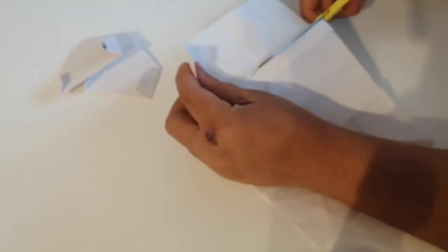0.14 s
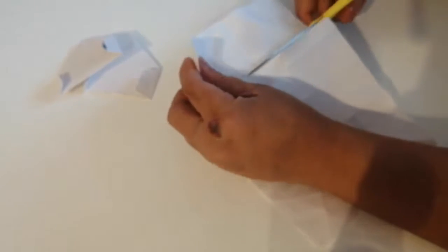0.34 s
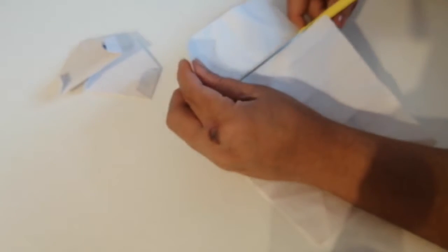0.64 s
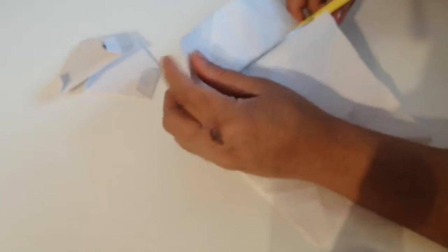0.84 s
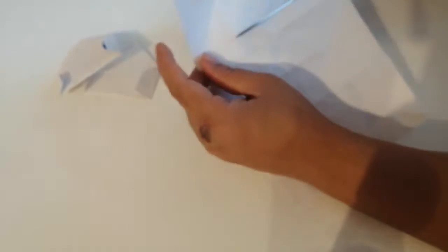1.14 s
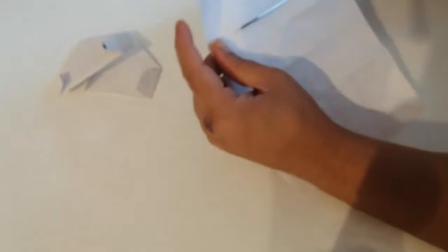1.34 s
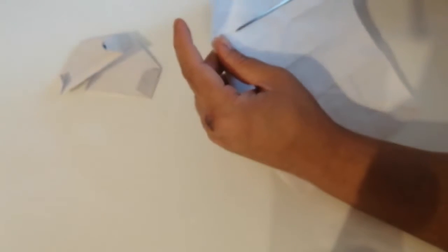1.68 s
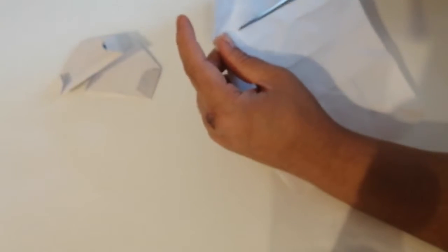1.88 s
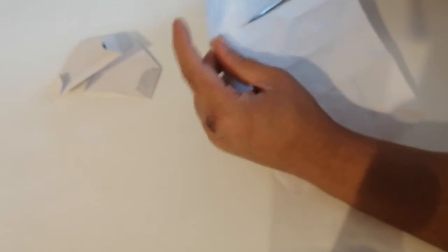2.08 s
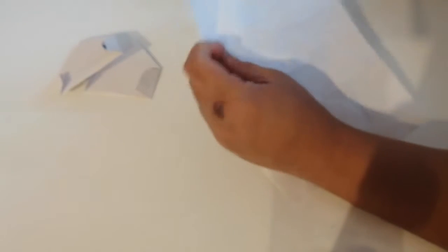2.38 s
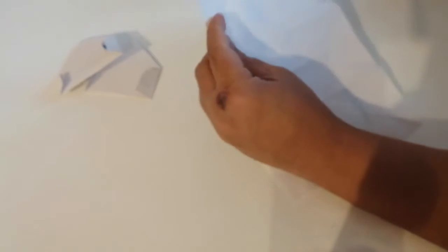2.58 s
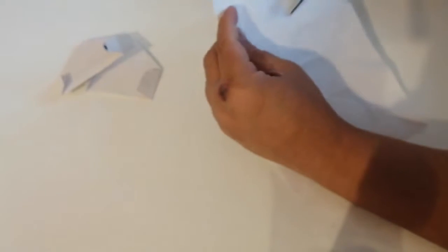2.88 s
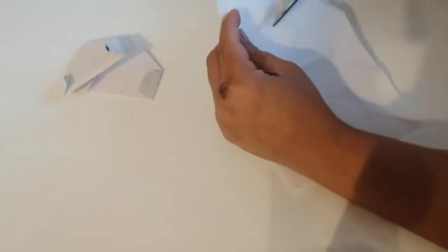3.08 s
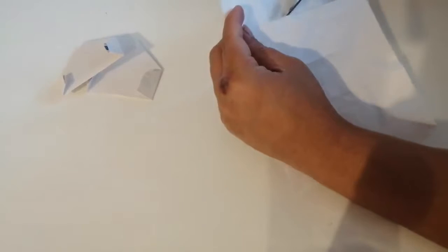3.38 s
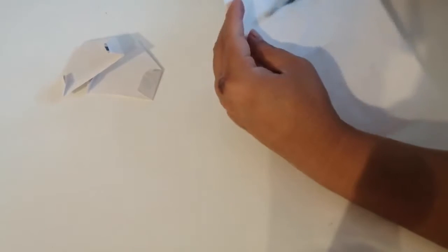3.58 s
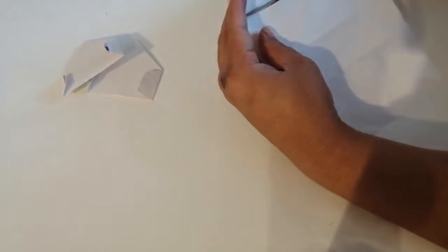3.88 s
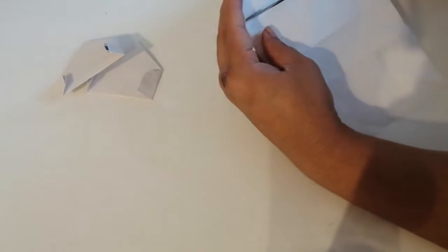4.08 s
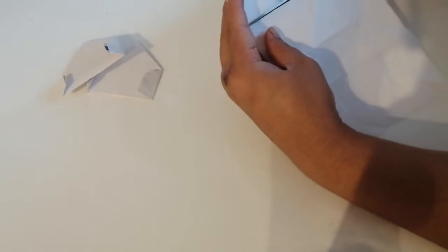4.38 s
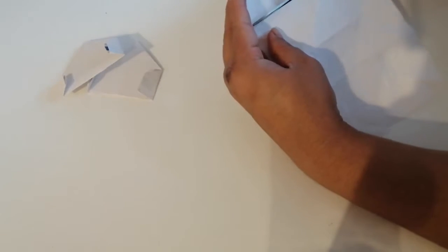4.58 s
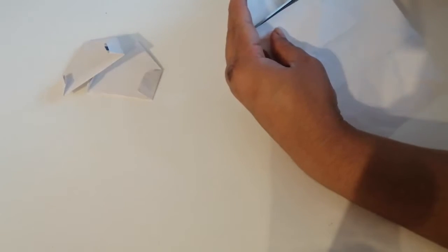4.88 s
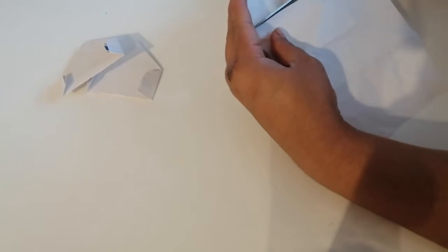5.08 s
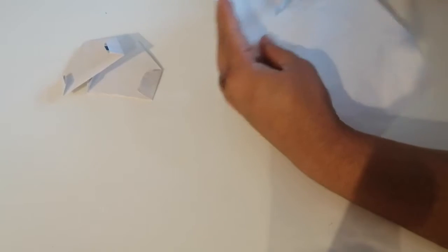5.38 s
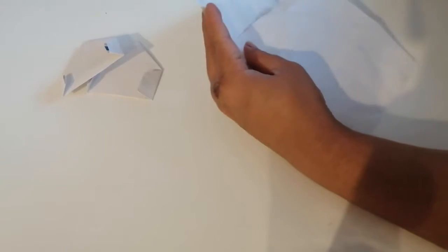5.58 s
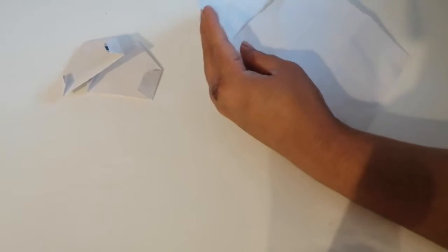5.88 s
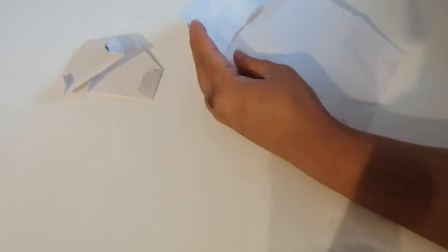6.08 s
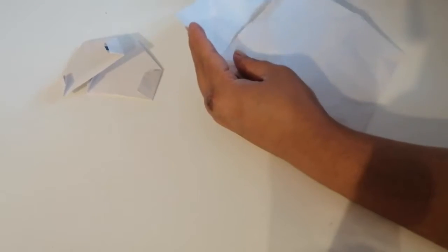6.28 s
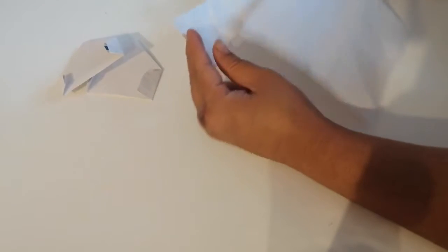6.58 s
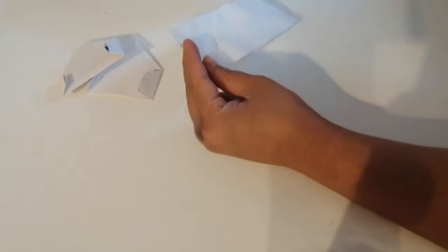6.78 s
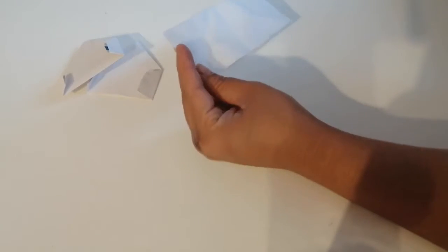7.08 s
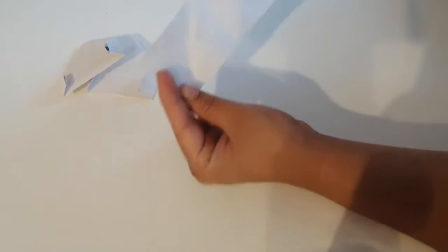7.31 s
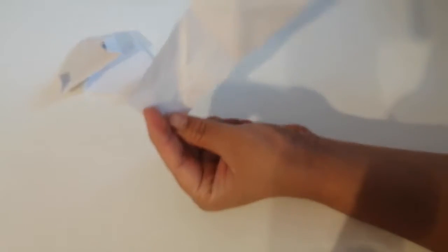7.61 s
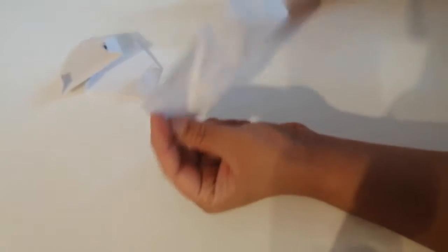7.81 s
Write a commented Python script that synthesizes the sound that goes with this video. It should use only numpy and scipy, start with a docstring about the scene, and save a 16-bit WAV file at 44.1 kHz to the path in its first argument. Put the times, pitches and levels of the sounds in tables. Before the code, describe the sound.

Scissors shear a sheet of paper above a table in a small quiet room, heard close in stereo. Crisp crunches and rustling come thickly at first, then in scattered groups with pauses. Near six seconds the sheet snaps and pops loudly with a brief steel ring, followed by soft hand knocks and a short papery slide sinking in pitch. A faint low hum and hiss lie beneath.

```python
"""Scissors cut a sheet of paper held just above a table in a small, quiet room, over hum and faint hiss.
From the start the blades shear fibres in short crunching noise bursts; between cuts the sheet rubs as grainy noise.
It also buckles with hollow pops and rings on as decaying tones. Near six seconds come the loudest pops, two jolts
of the whole sheet and the strongest ring of the blades. Then the hand shifts on the table with dull noise and
knocks, and at the end the cut piece slides away, a hiss with a hoarse whistle sinking in pitch."""
import sys
import numpy as np
from scipy import signal
from scipy.fft import rfft, irfft
from scipy.io import wavfile

SR = 44100
rng = np.random.default_rng(int(sys.argv[2]) if len(sys.argv) > 2 else 0)


def dump(signal):
    """Clip the signal to [-1, 1] and save it as 16-bit WAV at the path in sys.argv[1]."""
    limited = np.clip(np.atleast_2d(signal).T, -1, 1)
    pcm = np.round(limited * 32767).astype(np.int16)
    wavfile.write(sys.argv[1], SR, pcm)


N = 350448
TIME = np.arange(N) / SR
CRUNCH_RING_S = 0.0014  # decay time of a fibre break, shared by cuts and crinkles
BOTH_WAYS = np.array([[1], [-1]])  # left up, right down


def from_db(db):
    """Decibels to amplitude ratio: 20 dB is a factor of ten."""
    return 10 ** (np.asarray(db) / 20)


def rms_one(x):
    """Normalise to unit root-mean-square level over all channels."""
    return x / np.sqrt(np.mean(x ** 2) + 1e-20)


def at_hz(points, hz):
    """Interpolate a table of (Hz, value) on a logarithmic frequency axis."""
    f, value = np.transpose(points)
    return np.interp(np.log(np.maximum(hz, 1)), np.log(f), value)


def colour(x, spectrum, size=1024):
    """Minimum-phase filtering: folding the cepstrum makes the given spectrum causal."""
    magnitude = from_db(at_hz(spectrum, np.fft.rfftfreq(size, 1 / SR)))
    cepstrum = irfft(np.log(magnitude))
    cepstrum[1:size // 2] *= 2
    cepstrum[size // 2 + 1:] = 0
    response = irfft(np.exp(rfft(cepstrum)))
    return signal.oaconvolve(x, response[None], axes=1)[:, :x.shape[1]]


def band(x, low_hz, high_hz):
    """Band-pass filtering between two frequencies."""
    edges = [low_hz, min(high_hz, SR * 0.45)]
    return signal.sosfilt(signal.butter(2, edges, "band", fs=SR, output="sos"), x)


def drift(rate):
    """Slow random wander: straight lines between normal draws of spread 1, `rate` per second."""
    return np.interp(TIME * rate, np.arange(4096), rng.standard_normal(4096))


def resonate(x, hz, width_hz):
    """A two-pole resonance with unit gain near its peak."""
    r = np.exp(-np.pi * width_hz / SR)
    poles = [1, -2 * r * np.cos(2 * np.pi * hz / SR), r * r]
    return signal.lfilter([(1 - r * r) / 2, 0, (r * r - 1) / 2], poles, x)


def join_bass(x, below_hz=450):
    """Long waves reach both ports alike, so the stereo difference loses its bass."""
    high_pass = signal.butter(2, below_hz, "high", fs=SR, output="sos")
    side = signal.sosfilt(high_pass, (x[0] - x[1]) / 2)
    return x.mean(axis=0) + side * BOTH_WAYS


def add(out, sound, s):
    """Superpose a sound on the output, starting at s seconds."""
    i = max(round(s * SR), 0)
    out[:, i:i + sound.shape[1]] += sound[:, :N - i]


def fibres(n, grain_db, alike, lag=2):
    """Partly correlated noise of very uneven grains: tiny fibre breaks at two ports, the left one nearer."""
    grain_sizes = from_db(grain_db * np.minimum(rng.exponential(1, n // 16 + 1), 5))
    sizes = grain_sizes.repeat(16)[:n]
    shared = rng.standard_normal(n + lag)
    own = rng.standard_normal((2, n))
    alike = np.clip(alike, 0, 1)
    common = np.array([shared[lag:], shared[:n]])  # the right port hears it `lag` samples later
    return rms_one(sizes * (np.sqrt(alike) * common + np.sqrt(1 - alike) * own))


def arch(s, length):
    """Speed of one push from rest to rest: a single arch that peaks a little early."""
    skew, swell = 0.58, 1.23
    progress = np.clip((TIME - s) / length, 0, 1)
    return np.abs(np.sin(np.pi * progress ** skew)) ** swell


def gliding_band(hz, width_hz):
    """Quadrature modulation shifts low-passed noise to a moving centre frequency; stereo, rms 1."""
    phase = 2 * np.pi * np.cumsum(hz) / SR
    noise = [fibres(N, grain_db=2.0, alike=0.45) for _ in range(2)]
    swell = signal.sosfilt(signal.butter(2, width_hz, fs=SR, output="sos"), noise)
    return rms_one(swell[0] * np.sin(phase) + swell[1] * np.cos(phase))


def burst(length, levels_db, hz, spectrum, grain_db, ring_s, rise_s, snap, resonance_db, size=6144):
    """Impulsive excitation of a resonator: a first snap and a run of fibre breaks ring the bent sheet."""
    catch_db, catches_per_s = 1, 170  # the blades catch and slip within one cut
    ripple_db = 2.5  # each spot of the sheet favours its own pitches
    sheet_width_hz = 380
    length = np.clip(length, 0.001, 0.1)
    t = np.arange(size) / SR
    rise = 1 - np.exp(-t / (rise_s + length / 10))
    fall = np.exp(-np.maximum(t - length * 1.03, 0) / (ring_s + length / 10))
    catching = np.interp(t * catches_per_s, np.arange(64), rng.standard_normal(64))
    breaks = fibres(size, grain_db, alike=0.52) * rise * fall * from_db(catch_db * catching)
    breaks[:, 10] += snap
    pitches = np.geomspace(60, 15000, 72)
    rippled_db = at_hz(spectrum, pitches) + ripple_db * rng.standard_normal(len(pitches))
    sheet = join_bass(colour(breaks, np.column_stack([pitches, rippled_db])))
    sheet = sheet + from_db(resonance_db) * resonate(sheet, hz, sheet_width_hz)
    # low, middle and treble registers, each with its own level and alternating sign
    registers = [(80, 900), (900, 3800), (3800, 19000)]
    parts = [(-1) ** k * from_db(levels_db[k]) * rms_one(band(sheet, *edges))
             for k, edges in enumerate(registers)]
    return sum(parts) * np.sqrt(length * SR / size)  # energy in proportion to length


def background():
    """Steady sources: hum partials with slight phase and level modulation, and even coloured noise."""
    # Mains hum. Each row: frequency in Hz, rms level in dB before the slow swell.
    hum_partials = [(48.9, -89.5), (98.0, -63.5), (195.8, -90)]
    # Spectrum of the hiss. Each row: frequency in Hz, level in dB before normalising.
    hiss_colour = [(25, -15.5), (40, -11.5), (56, -18), (75, -14.5), (100, -20), (140, -15), (300, -22),
                   (1050, -28), (2000, -50), (2500, -29.5), (3050, -25.5), (3700, -42), (6000, -34.5),
                   (7800, -42.5), (15500, -39)]
    hiss_db = -65.5
    sway_s = 0.00015 * drift(6)
    swell = from_db(0.9 * drift(6))
    hum = sum(np.sqrt(2) * from_db(db) * np.sin(2 * np.pi * hz * (TIME + sway_s)) for hz, db in hum_partials)
    hiss = rms_one(colour(fibres(N, grain_db=2.0, alike=0.27), hiss_colour, size=4096))
    return hum * swell + from_db(hiss_db) * hiss


def room(x):
    """Reverberation: diffuse reflections decay at a rate set by frequency; a few standing waves stand out."""
    # Decay of the room. Each row: frequency in Hz, time to fall by 60 dB in seconds.
    decay_times = [(120, 0.4), (500, 0.64), (2000, 0.5), (6000, 0.38), (14000, 0.32)]
    # Standing waves. Each row: frequency in Hz, level in the impulse response in dB, 60 dB decay in seconds.
    standing_waves = [(114.3, -51.5, 0.5), (244, -78, 0.98), (290, -71, 0.65), (604, -41.5, 0.085)]
    gap_s, build_s = 0.004, 0.0009
    t, tail = TIME[:SR], 0
    edges = 70 * 2. ** np.arange(9)  # octaves
    for hz in edges[:-1] * np.sqrt(2):
        mid, side = band(rng.standard_normal((2, SR)), hz / np.sqrt(2), hz * np.sqrt(2))
        alike = 1 / (1 + (hz / 520) ** 4)  # the ports agree in the bass only
        stereo = np.sqrt(1 + alike) * mid + np.sqrt(1 - alike) * side * BOTH_WAYS
        tail = tail + stereo * from_db(-60 * t / at_hz(decay_times, hz))
    build_up = 1 - np.exp(-np.maximum(t - gap_s, 0) / build_s)
    tail = rms_one(tail * build_up) / np.sqrt(SR)  # unit energy
    tail = tail + sum(from_db(db - 60 * t / t60) * np.sin(2 * np.pi * hz * t) for hz, db, t60 in standing_waves)
    return signal.fftconvolve(x, tail, axes=1)[:, :N]


def shifting():
    """Sliding friction: the side of the hand drags over the table in uneven lumps of dull noise."""
    # Shifts of the hand. Each row: start in seconds, length in seconds, level at the arch's peak in dB.
    shifts = [(6.357, 0.3, -79), (6.74, 0.46, -72.5), (7.22, 0.77, -82)]
    # Spectrum of the rumble. Each row: frequency in Hz, level in dB before normalising.
    rumble_colour = [(100, -25), (190, -8), (290, -3), (400, -4), (550, 0), (750, -16), (1500, -21),
                     (4000, -43)]
    rumble = join_bass(colour(fibres(N, grain_db=2.5, alike=0.75), rumble_colour))
    rumble = rms_one(rumble * from_db(5 * drift(35)))
    return rumble * sum(from_db(db) * arch(s, length) for s, length, db in shifts)


def knocks():
    """Modal impact: soft contacts of hand and table ring low modes, each contact at a pitch of its own."""
    # Contacts. Each row: start in seconds, level in dB before the modes' own levels and the soft attack,
    # nominal lowest pitch in Hz before the random detuning.
    contacts = [(0.054, -53, 284), (0.092, -56, 292), (2.597, -69.5, 322), (4.118, -63, 297),
                (5.808, -58, 285), (6.321, -54.5, 270), (6.494, -71, 263), (6.715, -69, 300),
                (6.78, -70.5, 296), (6.901, -61.5, 340), (6.96, -73, 321), (7.002, -64, 275),
                (7.064, -61.5, 257), (7.288, -66, 296), (7.355, -66.5, 301), (7.576, -66, 301),
                (7.641, -60.5, 259), (7.703, -76, 253), (7.862, -71, 392)]
    # Table top. Each row: frequency in Hz (only ratios to the first count), relative level in dB,
    # 60 dB decay in seconds.
    table_modes = [(293.5, 11, 0.068), (359, 7.5, 0.056), (564, 6.5, 0.07)]
    sag, settle_s = 0.16, 0.015  # pitch starts flat by this share and climbs as the contact tightens
    out, t = np.zeros((2, N)), TIME[:SR // 4]
    elapsed = np.cumsum(1 - sag * np.exp(-t / settle_s)) / SR  # seconds, warped by the climb
    attack = 1 - np.exp(-t / 0.0045)
    for s, db, pitch_hz in contacts:
        ring = 0
        for hz, mode_db, t60 in table_modes:
            mode_hz = hz * pitch_hz / table_modes[0][0] * (1.076 + 0.033 * rng.normal())
            ring = ring + from_db(db + mode_db - 60 * t / t60) * np.sin(2 * np.pi * mode_hz * elapsed)
        add(out, (ring * attack)[None], s)
    return out


def slide():
    """Friction and air resonance: the piece glides; the gap beneath whistles hoarsely, sinking in pitch."""
    # Course of the slide. Each row: time in seconds, hiss level in dB, whistle level in dB (both before
    # the port trims), whistle pitch in Hz before its flutter.
    course = [(7.666, -65, -70, 2135), (7.687, -57.5, -68, 2050), (7.729, -61, -58.5, 2090),
              (7.81, -58.5, -58.5, 1843), (7.87, -56.5, -62, 1694), (7.914, -52.5, -59, 1690),
              (7.95, -60, -62, 1700)]
    # Spectrum of the hiss. Each row: frequency in Hz, level in dB before normalising.
    slide_colour = [(300, -5.5), (1000, -9), (2000, -10), (3200, -3), (3900, -14), (4700, -6.5),
                    (6700, -4.5), (8000, -10.5), (15000, -23)]
    port_db = np.array([[-5], [-1.5]])  # left, right
    s, hiss_db, whistle_db, hz = np.transpose(course)
    pitch_hz = np.interp(TIME, s, hz) * 2 ** (0.025 * drift(90))
    whistle = rms_one(gliding_band(pitch_hz, width_hz=105) * from_db(1.5 * drift(70)))
    hiss = rms_one(colour(fibres(N, grain_db=2.5, alike=0.24), slide_colour)) * from_db(1.8 * drift(50))
    return sum(x * from_db(np.interp(TIME, s, db, left=-120) + port_db)
               for x, db in [(hiss, hiss_db), (whistle, whistle_db)])


def crinkling():
    """Random impulses: sparse ticks of uneven size in the rubbing paper, each a brief decay of noise."""
    per_s, spread_db = 150, 4
    sizes = from_db(spread_db * np.clip(rng.standard_normal(N), -2, 2))
    ticks = (rng.random(N) < per_s / SR) * sizes
    decay = np.exp(-1 / (CRUNCH_RING_S * SR))
    envelope = signal.lfilter([1], [1, -decay], ticks + 1e-18)
    return rms_one(envelope * fibres(N, grain_db=1.0, alike=0.73))


def rubbing():
    """Stick-slip friction: paper over steel and skin, a grainy hiss with crinkles and fitful resonances."""
    # Pushes along blades, fingers or table. Each row: start in seconds, length in seconds, level in dB,
    # brightness (treble against the level) in dB, hollow resonance in Hz, crinkles in dB re unit rms.
    strokes = [(0.045, 0.2, -54.5, -13, 1300, 2.5), (0.24, 0.31, -54.5, -1, 1292, -7.5),
               (0.555, 0.25, -64.5, -9, 1686, -5.5), (0.696, 0.2, -59.5, -12, 915, -3),
               (0.828, 0.32, -73, 23.5, 1720, -10), (1.01, 0.2, -68.5, 13, 1595, -6),
               (1.243, 0.33, -55.5, -6, 612.6, -9.5), (1.575, 0.19, -60, 4, 1402, -1.5),
               (2.05, 0.39, -58.5, 2, 1028, -4), (2.474, 0.37, -73.5, -0.5, 1370, -3.5),
               (2.911, 0.43, -56, -6, 1352, -8), (3.329, 0.65, -63, 4.5, 1649, -6),
               (3.517, 0.21, -61, 5.5, 1900, -4), (3.685, 0.48, -60.5, -7.5, 995, -6.5),
               (4.365, 0.1, -57.5, -12, 1464, -3), (4.553, 0.25, -56.5, -3.5, 1882, -2.5),
               (6.329, 0.79, -81, 14, 1790, -6), (6.88, 0.17, -58, -21, 500, -9),
               (7.15, 0.36, -68.5, 5, 2006, -6)]
    # Spectrum of the rub. Each row: frequency in Hz, level in dB before normalising.
    rub_colour = [(150, -33), (350, -7), (600, -4), (1300, -1.5), (2600, -2), (3700, -9), (5200, 0),
                  (6600, 5), (7600, -0.5), (8800, 5), (10500, -2.5), (12500, -9), (15000, 1)]
    flex_share, flex_rate = 1.1, 20  # share of the flexing resonances, their changes per second
    resting_db, resting_brightness_db = -74, -9.5  # the held sheet is never quite still
    # main resonance of the bent sheet
    hollow_db, hollow_wander_octaves, hollow_width_hz = -7.5, 0.16, 170
    grains = colour(fibres(N, grain_db=-1.5, alike=0.33), rub_colour)
    grains = grains * from_db(0.91 * drift(70) + 1.93 * drift(21))  # catches and lets go
    flexing = sum(resonate(grains, hz, hz / 14) * np.maximum(drift(flex_rate), 0)
                  for hz in np.geomspace(580, 9000, 14))
    grains = join_bass(grains + flex_share * flexing)
    ticks = join_bass(colour(crinkling(), rub_colour))

    pushes = np.array([from_db(db) * arch(s, length) for s, length, db, *_ in strokes])
    brightness_db, hz, crinkle_db = np.transpose(strokes)[3:]
    push, leading = pushes.max(axis=0), pushes.argmax(axis=0)  # the strongest push rules
    middle = np.maximum(push, from_db(resting_db))
    bright_push = (pushes * from_db(brightness_db)[:, None]).max(axis=0)
    treble = np.maximum(bright_push, from_db(resting_db + resting_brightness_db))
    crinkle_gain = from_db(crinkle_db)[leading]
    body, edge = [0.87 * rms_one(band(grains, *edges)) + crinkle_gain * rms_one(band(ticks, *edges))
                  for edges in [(180, 4300), (3900, 12700)]]
    hollow_hz = hz[leading] * 2 ** (hollow_wander_octaves * drift(13))
    hollow = gliding_band(hollow_hz, hollow_width_hz)
    return body * middle - edge * treble + from_db(hollow_db) * hollow * push


def thumps():
    """Modal excitation: jolts of the whole sheet make it ring briefly in its modes."""
    # Jolts. Each row: start in seconds, level in dB before the modes' own levels,
    # tilt in dB per octave about 300 Hz.
    jolts = [(5.913, -39, -1), (6.031, -30, 0.5)]
    # Modes of the whole sheet. Each row: frequency in Hz, relative level in dB, 60 dB decay in seconds.
    sheet_modes = [(124, -10, 0.14), (235, -11, 0.12), (286, 0, 0.11), (327, -5.5, 0.069),
                   (572, -6.5, 0.13), (1110, -17, 0.075), (1278, -0.5, 0.084), (1420, -12, 0.12)]
    out, t = np.zeros((2, N)), TIME[:SR // 2]
    for s, db, tilt_db in jolts:
        ring = 0
        for hz, mode_db, t60 in sheet_modes:
            level_db = db + mode_db + tilt_db * np.log2(hz / 300)
            ring = ring + from_db(level_db - 60 * t / t60) * np.sin(2 * np.pi * hz * t)
        add(out, ring[None], s)
    return band(out, 105, 6000)


def twangs():
    """Free vibration: a taut stretch let go rings on; its pitch rises and wavers as it springs flat."""
    # Releases. Each row: start in seconds, level in dB before the attack, settled pitch in Hz
    # before the waver, 60 dB decay in seconds.
    releases = [(0.092, -58, 659, 0.56), (0.378, -43.5, 615, 0.22), (0.739, -52, 656, 0.42),
                (1.303, -50.5, 600, 0.13), (2.156, -45.5, 615, 0.19), (5.242, -52, 640, 0.27),
                (5.913, -41.5, 591, 0.31)]
    sag, settle_s = 0.11, 0.013  # starts flat by this share and settles
    out, t = np.zeros((2, N)), TIME[:SR // 2]
    attack = 1 - np.exp(-t / 0.00097)
    for s, db, hz, t60 in releases:
        bend = 1 - sag * np.exp(-t / settle_s) + 0.02 * drift(63)[:len(t)]
        phase = 2 * np.pi * np.cumsum(hz * bend) / SR
        add(out, (np.sin(phase) * attack * from_db(db - 60 * t / t60))[None], s)
    return out


def clinks():
    """Damped modes: steel meets steel and the fingers damp the ring quickly."""
    # Meetings of the blades. Each row: start in seconds, level in dB before the modes' own levels.
    meetings = [(1.752, -60), (4.271, -60), (4.379, -59), (5.117, -61), (5.913, -45)]
    # Modes of the blades. Each row: frequency in Hz, relative level in dB before a random spread,
    # 60 dB decay in seconds.
    blade_modes = [(1647, -2, 0.26), (2700, -7, .22), (3290, -3, .25), (3900, -7, .2), (5200, 3, 0.24),
                   (6140, -4, 0.16), (6600, -3, .22), (8500, 3, .15), (9560, 1, 0.21)]
    out, t = np.zeros((2, N)), TIME[:SR // 3]
    for s, db in meetings:
        ring = 0
        for hz, mode_db, t60 in blade_modes:
            level_db = db + mode_db + 2 * rng.normal()
            cycles = hz * t + rng.random((2, 1))  # random phase at each port
            ring = ring + from_db(level_db - 60 * t / t60) * np.sin(2 * np.pi * cycles)
        add(out, ring, s)
    return out


def pops():
    """Radiation by area: a small buckle holds no bass. Gives direct sound and the share sent to the room."""
    # The sheet buckles, snaps free or flaps down. Each row: start in seconds, length in seconds, low, middle
    # and treble levels in dB, sheet resonance in Hz, relative room send in dB, lowest pitch of the area in Hz.
    buckles = [(0.067, 0.0027, -46, -34, -38, 1410, -8.5, 190),
               (0.091, 0.0019, -44, -37.5, -42, 1310, -11.5, 170),
               (0.738, 0.0053, -40, -36.5, -54, 2220, -9, 630),
               (0.844, 0.0059, -46, -43, -43.5, 2110, -10, 680),
               (1.4, 0.0026, -44, -34.5, -47, 1560, -12.5, 554),
               (1.7502, 0.0027, -73, -41.5, -41, 1590, -14, 500),
               (2.631, 0.0034, -46.5, -59, -69, 1350, -8, 705),
               (4.3977, 0.0017, -45.5, -35.5, -36, 1600, -10, 400),
               (5.913, 0.0016, -34, -34.5, -22.5, 1540, -3.5, 196),
               (6.03, 0.0026, -33, -23.5, -33.5, 1290, -4.5, 70),
               (6.034, 0.0033, -39, -32.5, -49, 1250, -3, 90),
               (6.054, 0.0022, -47, -37, -40, 1500, -2, 200),
               (6.059, 0.089, -49.5, -48.5, -73, 1620, 1, 80),
               (6.0757, .003, -33.5, -35, -43, 1400, -3.5, 70),
               (6.121, .005, -38.5, -40, -51, 1300, -3.5, 70),
               (6.174, 0.0058, -43, -46, -64, 1100, -1.5, 110),
               (6.61, 0.0048, -68, -47, -69, 1450, -8, 900)]
    # Spectrum of a pop. Each row: frequency in Hz, level in dB before the registers are normalised.
    pop_colour = [(60, -6), (130, 5), (180, -1.5), (290, 1.5), (430, -16.5), (600, -1), (850, -6.5),
                  (1300, -7.5), (2800, -6.5), (4000, -13), (6300, -1.5), (8000, -7), (12500, -16),
                  (15000, -22)]
    direct, sent = np.zeros((2, 2, N))
    hz, db = np.transpose(pop_colour)
    for s, length, low_db, middle_db, treble_db, resonance_hz, send_db, lowest_hz in buckles:
        bass_loss_db = 10 * np.log10(1 + (lowest_hz / hz) ** 6)
        spectrum = np.column_stack([hz, db - bass_loss_db])
        pop = burst(length, (low_db, middle_db, treble_db), resonance_hz, spectrum,
                    grain_db=0.5, ring_s=0.00071, rise_s=0.0001, snap=3.6, resonance_db=3)
        add(direct, pop, s)
        add(sent, pop * from_db(send_db), s)
    return direct, sent


def crunch(length, db, brightness_db, hz):
    """Fracture noise: a run of fibre breaks, a little off centre; a larger, lower area gives more bass."""
    # Spectrum of a cut. Each row: frequency in Hz, level in dB before the registers are normalised.
    cut_colour = [(100, -9.5), (200, -7.5), (420, -9.5), (600, -5), (1300, -3.5), (2600, 0), (3700, -8),
                  (5200, 1), (6600, 6), (7600, -4.5), (8800, 4.5), (10300, -7), (12500, -16.5), (15000, -9)]
    body_db, body_db_per_octave = -1, 12  # bass at a 1 kHz resonance, gain per octave below it
    low_db = db + body_db - body_db_per_octave * np.log2(hz / 1000)
    sound = burst(length, (low_db, db, db + brightness_db), hz, cut_colour,
                  grain_db=2.5, ring_s=CRUNCH_RING_S, rise_s=0.0004, snap=3.7, resonance_db=0.5)
    return sound * from_db(0.85 * rng.normal() * BOTH_WAYS)


def cuts():
    """Shear fracture: each squeeze crunches through a few millimetres of paper; snaps are very short crunches."""
    # Blades shearing the sheet. Each row: start in seconds, length in seconds, level in dB before the common
    # trim, brightness (treble against middle) in dB, sheet resonance in Hz.
    shears = [(0.05, 0.026, -46.5, 8, 1410), (0.218, 0.016, -49, 0, 1340), (0.38, 0.028, -43.5, -3, 1250),
              (1.417, 0.01, -50, -23, 600), (1.581, 0.015, -45, -0.5, 3220),
              (1.616, 0.019, -50.5, 12.5, 1510), (2.031, 0.033, -68, 15.5, 587),
              (2.151, 0.028, -50, -16, 860), (2.236, 0.044, -47, 8, 1250), (2.332, 0.027, -53, 9.5, 3080),
              (3.06, 0.067, -52.5, 7.5, 1320), (4.27, 0.0074, -46, 11, 1680), (4.287, 0.032, -50, 8, 2420),
              (4.377, 0.0075, -44.5, 14, 2250), (4.575, 0.0085, -62.5, 18.5, 555),
              (4.61, 0.045, -62, 11.5, 2380), (5.116, 0.008, -58, 8.5, 2440),
              (5.166, 0.049, -55, 11.5, 2600), (5.207, 0.04, -49, 7.5, 2670),
              (6.903, 0.012, -54.5, 5, 1850)]
    # Sharp snaps of blade and crease. Each row: start in seconds, length in seconds, level in dB before
    # the common trim, brightness in dB.
    sharp_snaps = [(0.124, 0.0034, -52, 0), (0.207, 0.0032, -43.5, -2), (0.214, 0.003, -44.5, 1),
                   (0.2175, 0.0017, -35, -3), (0.279, 0.0017, -43, 4), (0.294, 0.0038, -51, -8),
                   (0.355, 0.0025, -42.5, -9), (0.376, 0.0054, -37, -12), (0.4, 0.0073, -45, -16),
                   (0.425, .003, -49, 7), (0.444, 0.0043, -48.5, -2), (0.463, 0.0071, -55.5, 9),
                   (0.587, .002, -72, -9), (0.646, 0.0025, -52, -2), (0.722, 0.0035, -45, 8),
                   (1.055, .008, -59, -3), (1.094, 0.0033, -51.5, 7), (1.513, .003, -61.5, 6),
                   (1.561, .003, -53.5, 4), (1.653, 0.0045, -51, 8), (1.699, 0.0056, -49.5, 8),
                   (2.144, 0.0026, -59, 5.5), (2.156, 0.0025, -49, 9), (2.174, 0.0015, -51, 11),
                   (2.196, 0.0039, -50.5, 6), (2.324, 0.0023, -45, 11), (2.396, 0.003, -51, -14.5),
                   (2.916, .001, -52, 8), (2.928, 0.0027, -51.5, 7.5), (2.942, 0.0064, -49, 8),
                   (2.991, 0.002, -44, -12), (3.428, 0.0029, -49, 4), (4.013, 0.0036, -51.5, -8),
                   (4.099, 0.0016, -46, 10.5), (4.119, 0.0043, -49.5, 8), (4.818, .002, -59, -1),
                   (4.929, 0.0039, -54.5, 2), (5.127, 0.0022, -54, 8), (5.137, 0.007, -43, 9.5),
                   (5.1462, 0.0013, -40.5, 15.5), (5.157, .004, -49, 8), (5.244, 0.0014, -32, 5),
                   (6.0435, 0.00092, -26.5, 6), (6.0894, 0.0026, -33, 2), (6.1045, 0.002, -34, -5),
                   (6.111, 0.0014, -35, -9), (6.311, 0.0064, -45, -7.5), (6.438, 0.002, -44, 3),
                   (6.894, 0.0018, -49.5, 6), (7.16, 0.0027, -55, 3.5), (7.194, 0.0064, -61, 11)]
    snap_hz, spread_octaves = 1380, 0.11  # every snap rings a slightly different part of the sheet
    trim_db = -4.0
    out = np.zeros((2, N))
    for s, *settings in shears:
        add(out, crunch(*settings), s)
    for s, length, db, brightness_db in sharp_snaps:
        hz = snap_hz * 2 ** (spread_octaves * rng.normal())
        add(out, crunch(length, db, brightness_db, hz), s)
    return from_db(trim_db) * out


def scene():
    """Superposition of the close paper sounds, their reverberation and the background."""
    floor = background()
    pop, pop_sent = pops()
    handling = rubbing() + slide() + knocks() + shifting()
    cutting = cuts()
    ringing = twangs() + thumps() + clinks()
    reverberation = room(from_db(-7.5) * cutting + from_db(1.5) * pop_sent + from_db(-11.0) * handling)
    return cutting + ringing + pop + handling + reverberation + floor


def record(dry):
    """Port resonance: each microphone port adds its own colour, then a steep low-pass cuts the top."""
    # Mismatch of the ports. Each row: frequency in Hz, left minus right level in dB.
    port_tilt = [(100, -2), (700, 1), (2500, -0.5), (4800, -1.5), (5700, -5), (6700, -10), (7600, 0),
                 (8800, 18), (10000, 8), (12000, 0), (14000, 1.5), (15500, -16)]
    cutoff_hz = 15800
    hz, tilt_db = np.transpose(port_tilt)
    ports = []
    for k, sign in enumerate((-1, 1)):
        gain_db = 10 * np.log10(2 / (1 + from_db(sign * tilt_db) ** 2))  # keeps the summed power
        ports.append(colour(dry[[k]], np.column_stack([hz, gain_db]))[0])
    return signal.sosfilt(signal.ellip(10, 0.2, 80, cutoff_hz, fs=SR, output="sos"), ports)


dry = scene()
out = record(dry)
dump(out)
```